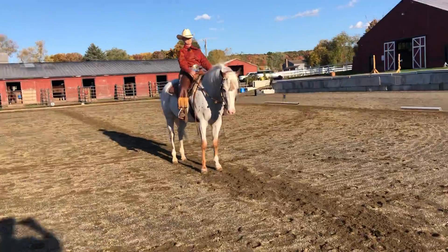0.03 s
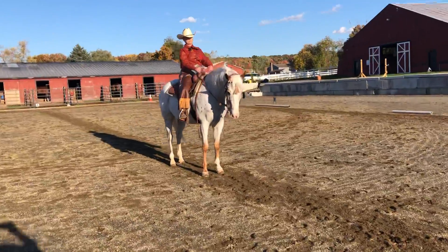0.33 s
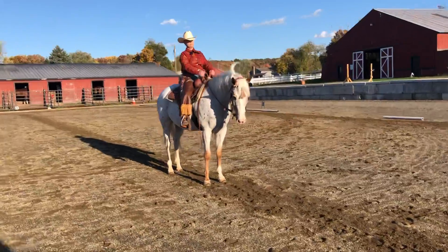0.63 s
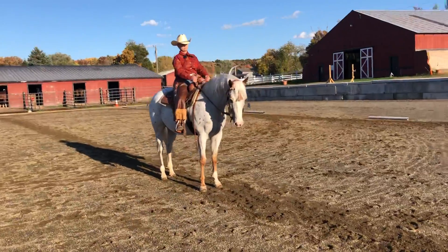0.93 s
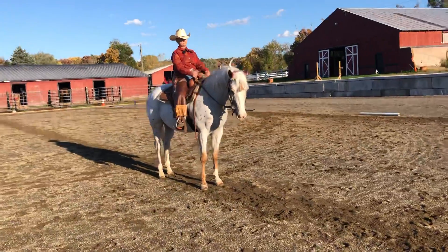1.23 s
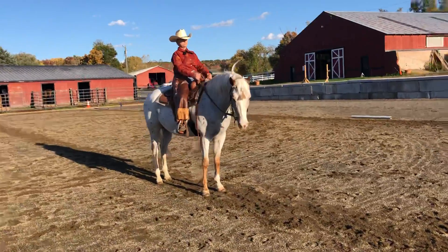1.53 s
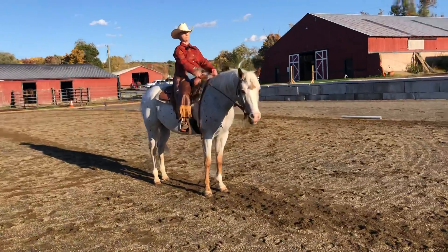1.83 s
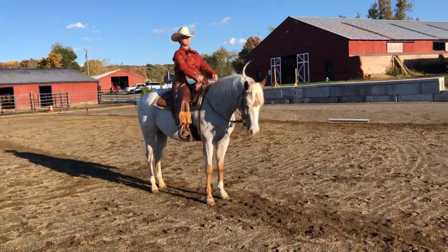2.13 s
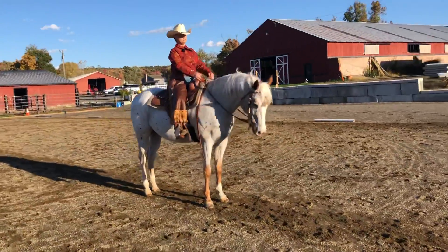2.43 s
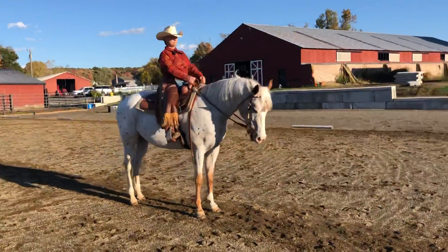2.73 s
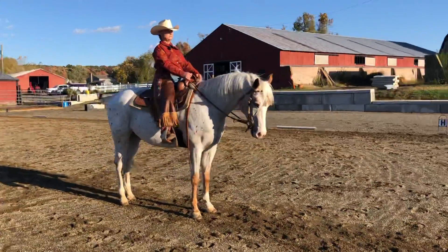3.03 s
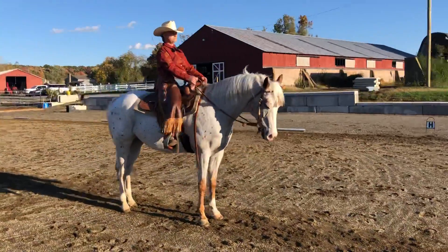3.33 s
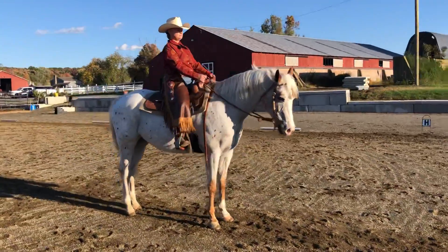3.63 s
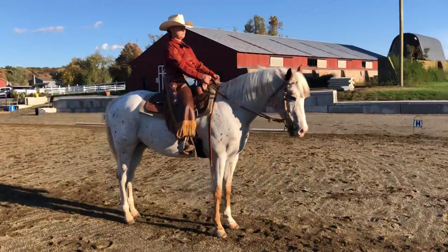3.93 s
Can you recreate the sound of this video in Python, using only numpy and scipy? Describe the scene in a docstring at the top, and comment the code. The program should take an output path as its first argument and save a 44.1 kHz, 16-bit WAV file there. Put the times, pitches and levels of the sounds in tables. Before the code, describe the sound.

Someone walks slowly over sand in an outdoor arena, the steps quiet under wind rumbling on a handheld microphone. One bright metal clink comes early, followed by light jingling like zip pulls, as the gusts grow stronger.

```python
"""Slow steps on the sand of an open riding arena, heard from the walker's hand.
A light breeze thumps the microphone at once; at 0.33 s small metal pieces (probably zip pulls)
give their loudest clink, then jingle and ring on as each step softly crushes the sand.
Gusts build from 1.3 s and buffet hardest near 2.1 s and 3.2 s; a sole drags near the end.
Under it all lie a faint outdoor hush and a few thin, far calls."""
import sys
import numpy as np
from scipy import signal
from scipy.fft import rfft, irfft
from scipy.io import wavfile
from scipy.ndimage import uniform_filter1d

SR = 44100
rng = np.random.default_rng(int(sys.argv[2]) if len(sys.argv) > 2 else 0)


def dump(signal):
    """Clip the signal to [-1, 1] and save it as 16-bit WAV at the path in sys.argv[1]."""
    limited = np.clip(np.atleast_2d(signal).T, -1, 1)
    pcm = np.round(limited * 32767).astype(np.int16)
    wavfile.write(sys.argv[1], SR, pcm)


N = 176400
T = np.arange(N) / SR

# Metal pieces knocking together. Each row: start in seconds, level in dB, ping pitch in Hz.
KNOCKS = [(0.201, -42, 5800), (0.3316, -13, 5890), (.3686, -30.5, 5700), (0.372, -34.5, 5610),
          (0.408, -38, 5700), (0.415, -44, 5740), (0.42, -49, 5900), (.4783, -47, 6470), (.5452, -53, 5940),
          (.6409, -42.5, 6150), (0.7037, -40, 6170), (0.7247, -39.5, 5730), (0.839, -53, 6100),
          (.892, -56, 6940), (0.96, -47.5, 6600), (0.978, -52, 6060), (1.1933, -41.5, 6420),
          (1.2291, -35.5, 6060), (1.2865, -49, 6200), (1.3855, -41.5, 6340), (1.391, -42.5, 5580),
          (1.46, -51.5, 6740), (1.6857, -42.5, 5560), (1.8497, -38, 5750), (1.855, -39, 5770),
          (1.9028, -42.5, 5780), (1.9814, -46, 6200), (2.0223, -48, 6040), (2.0638, -44.5, 6000),
          (2.5085, -40, 5900), (2.585, -53, 5820), (2.615, -49, 5650), (2.692, -59, 5620),
          (2.854, -42, 5630), (2.9266, -45, 5680), (3.045, -43, 5640), (3.085, -42.5, 5800),
          (3.096, -39.5, 5730), (3.1314, -36.5, 5590), (3.2136, -50, 6040), (3.3283, -54, 6030),
          (3.501, -52.5, 8400), (3.7274, -53, 5980), (3.879, -51.5, 5600)]


def from_db(db):
    """Decibels to gain."""
    return 10 ** (np.asarray(db) / 20)


def unit_rms(x):
    """Scale to rms 1."""
    return x / np.sqrt(np.mean(x ** 2) + 1e-20)


def envelope(points):
    """Gain per sample from (seconds, dB) points."""
    return from_db(np.interp(T, *np.transpose(points)))


def colour(x, points, tilt_db_per_oct=0):
    """Filter by (Hz, dB) points plus a tilt, 18 dB per octave down outside them; rms 1."""
    hz, db = np.transpose(points)
    octave, knots = np.log2(np.arange(N // 2 + 1) * SR / N + 1), np.log2(hz)
    outside_oct = np.abs(octave - np.clip(octave, knots[0], knots[-1]))
    gain_db = np.interp(octave, knots, db) + tilt_db_per_oct * (octave - knots.mean()) - 18 * outside_oct
    return unit_rms(irfft(rfft(x) * from_db(gain_db), N))


def lowpass(x, hz):
    """Zero-phase low-pass."""
    return signal.sosfiltfilt(signal.butter(2, hz, fs=SR, output="sos"), x)


def drift(rate_hz):
    """Random wander, mostly slower than the rate; rms 1."""
    hz = np.arange(N // 2 + 1) * SR / N
    return unit_rms(irfft(rfft(rng.standard_normal(N)) / (1 + (hz / rate_hz) ** 4), N))


def grains(per_s, spread_db):
    """Random clicks of uneven size and sign."""
    sizes = from_db(spread_db * np.minimum(rng.exponential(1, N), 4))
    return (rng.random(N) < per_s / SR) * sizes * rng.choice([-1, 1], N)


def even_out(x, span_s):
    """Flatten swells slower than the span."""
    return x / np.sqrt(uniform_filter1d(x ** 2, max(int(span_s * SR), 2)) + 1e-4)


def add(out, start_s, sound):
    """Mix a sound in at a time."""
    start = int(start_s * SR)
    out[start:start + len(sound)] += sound[:N - start]


def mode(t, hz, t60_s):
    """Decaying sine of a struck mode."""
    return np.sin(2 * np.pi * hz * t) * from_db(-60 * t / t60_s)


def footsteps():
    """The shoe crushes clumpy showers of sand grains that swell and die; a dragging sole rasps."""
    # Each row: start in seconds, level in dB, attack and decay in seconds, tilt in dB per octave.
    presses = [(.06, -66, 0.033, 0.19, 3), (.312, -56, 0.0086, 0.14, -3.5),
               (0.459, -58, 0.016, 0.032, -7.5), (0.891, -58, 0.03, 0.0059, -5),
               (1.116, -51, 0.015, 0.046, -2), (1.179, -61, 0.0055, 0.19, -4.5),
               (1.722, -49.5, 0.012, 0.016, -5), (1.755, -50.5, 0.008, 0.08, -3.5),
               (1.83, -55.5, 0.081, 0.027, -6), (2.13, -60, 0.17, 0.23, -6),
               (2.258, -43.5, 0.0012, 0.0039, -8.5), (2.37, -56, 0.059, 0.072, -2.5),
               (2.56, -70.5, 0.074, 1, -3.5), (2.924, -47, 0.019, 0.06, -3.5),
               (2.972, -51.5, 0.012, 0.034, -8), (3.04, -52, 0.068, 0.083, -7.5),
               (3.204, -58, 0.0035, 0.96, -11.5), (3.623, -52.5, 0.013, 0.13, -6.5),
               (3.71, -63, 0.068, 0.19, -9)]
    # Each row: frequency in Hz, level in dB.
    sand_spectrum = [(400, -11), (1000, -2), (2200, 0.5), (4200, 2.5), (5000, 0), (6500, 2), (8300, -2),
                     (10300, -10), (15500, -13)]
    # Each row: start and length in seconds, level in dB, rasp pitch in Hz.
    drags = [(0.646, 0.048, -55.5, 1670), (1.719, 0.024, -51.5, 3730), (1.754, 0.034, -59.5, 3440),
             (3.663, 0.35, -62.5, 1030)]
    sand = grains(per_s=2000, spread_db=2.5) * from_db(2 * drift(rate_hz=90))
    out = np.zeros(N)
    for start_s, db, attack_s, decay_s, tilt in presses:
        age_s = T - start_s
        pressure = np.clip(age_s / attack_s, 0, 1) * np.exp(-np.maximum(age_s - attack_s, 0) / decay_s)
        out += from_db(db) * pressure * colour(sand, sand_spectrum, tilt)
    for start_s, length_s, db, hz in drags:
        rasp = signal.lfilter(*signal.iirpeak(hz, Q=3.3, fs=SR), sand)
        arch = np.sin(np.pi * np.clip((T - start_s) / length_s, 0, 1))
        out += from_db(db) * arch * unit_rms(rasp)
    return out


def clinks():
    """Each knock: a gritty tick, a damped ping that bounces, weak metal modes, a short loose rattle."""
    # Each row: frequency in Hz, level in dB, 60 dB decay time in seconds.
    metal_modes = [(2600, -24.5, 0.018), (3310, -22, 0.025), (5460, -13.5, 0.033), (6230, -22.5, 0.073),
                   (6300, -20.5, 0.021), (8500, -22.5, 0.027), (10010, -28.5, 0.045), (11450, -13.5, 0.017)]
    # Each row: frequency in Hz, level in dB.
    tick_spectrum = [(1200, -43), (2800, -7), (4600, -18), (6200, -2.5), (9000, -20), (11600, -13),
                     (13000, -17), (15500, -19)]
    rise_s, ping_peak_s, tick_decay_s, rattle_decay_s = 0.00033, 0.00062, 0.0028, 0.0077
    usual_knock_db, bounce_s = -39.5, 0.0019
    out, t = np.zeros(N), T[:SR // 10]
    tick_noise = colour(rng.standard_normal(N), tick_spectrum)
    contacts = grains(per_s=900, spread_db=1.5)
    rise = 1 - np.exp(-t / rise_s)
    swell = t / ping_peak_s * np.exp(1 - t / ping_peak_s)
    for k, (start_s, db, hz) in enumerate(KNOCKS):
        phase, hardness_db = 2 * np.pi * hz * t, db - usual_knock_db
        ping = from_db(-0.5) * swell * np.sin(phase)
        tick = np.roll(tick_noise, k * len(t))[:len(t)] * np.exp(-t / tick_decay_s)
        tick *= from_db(-20 + 0.31 * hardness_db)  # harder knocks are brighter
        ringing = sum(from_db(mode_db + rng.normal(0, 1.9)) * mode(t, mode_hz, t60_s)
                      * rng.choice([-1, 1]) for mode_hz, mode_db, t60_s in metal_modes)
        chatter = np.roll(contacts, k * len(t))[:len(t)] * np.exp(-t / rattle_decay_s)
        rattle = signal.fftconvolve(chatter, swell * (np.sin(phase) + np.sin(1.15 * phase)))
        add(out, start_s, from_db(db) * (ping + rise * (tick + ringing)))
        add(out, start_s + np.round(bounce_s * hz) / hz, from_db(db - 5.5) * ping)  # whole cycles later
        add(out, start_s, from_db(-53 + 0.47 * hardness_db) * rattle)
    return out


def free_rings():
    """A struck piece swings free and sings one very high note that wavers as it turns."""
    # Each row: start in seconds, level in dB.
    swings = [(.203, -65), (0.373, -53), (0.411, -52.5), (.641, -58.5), (.84, -67), (.96, -73),
              (1.235, -59), (1.389, -60), (1.852, -59.5), (1.983, -64), (2.478, -66), (2.614, -70),
              (2.86, -58.5), (3.093, -54.5), (3.27, -67), (3.7, -70), (3.89, -71)]
    large_hz, small_hz, small_ping_above_hz = 11526, 12193, 5860
    rise_s, waver_db = 0.0054, 4.5
    knock_s, _, ping_hz = np.transpose(KNOCKS)
    out, t = np.zeros(N), T[:SR // 2]
    for start_s, db in swings:
        nearest_ping_hz = ping_hz[np.argmin(np.abs(knock_s - start_s))]
        hz = small_hz if nearest_ping_hz > small_ping_above_hz else large_hz
        add(out, start_s, from_db(db) * mode(t, hz, t60_s=0.36) * (1 - np.exp(-t / rise_s)))
    return out * from_db(waver_db * drift(rate_hz=63))


def breeze():
    """Wind rumbles on the microphone in puffs; small eddies break as soft pops, brighter in gusts."""
    # Each row: time in seconds, level in dB.
    rumble_levels = [(0.0, -33.5), (0.1, -49), (0.19, -48), (0.27, -37), (0.38, -50), (0.42, -40.5),
                     (0.6, -36), (0.83, -50.5), (0.97, -46), (1.02, -33.5), (1.24, -50.5), (1.36, -31.5),
                     (1.45, -36.5), (1.63, -31), (1.67, -53), (1.8, -35.5), (2.06, -41), (2.1, -25.5),
                     (2.14, -33.5), (2.32, -41), (2.68, -37), (2.86, -47), (3.02, -30), (3.06, -36),
                     (3.16, -25.5), (3.34, -37.5), (3.47, -30), (3.55, -47.5), (3.64, -35.5), (3.7, -40.5),
                     (3.83, -31.5), (3.87, -43), (4.0, -40.5)]
    bass_boosts = [(0, -4.5), (1.9, -15), (2.8, -0.5), (3.6, 9)]
    gust_levels = [(0.0, -54), (0.07, -69.5), (0.58, -53), (0.86, -68), (1.04, -53), (1.25, -71),
                   (1.34, -43), (1.44, -59.5), (1.55, -38.5), (1.57, -52), (1.59, -39), (1.69, -59.5),
                   (1.77, -30.5), (1.79, -44), (2.02, -30), (2.04, -45), (2.08, -26), (2.125, -29),
                   (2.15, -54), (2.21, -39.5), (2.32, -54), (2.55, -35), (2.67, -34), (2.87, -55.5),
                   (3.21, -36.5), (3.23, -47.5), (3.26, -29.5), (3.31, -57), (4.0, -70)]
    # Each row: frequency in Hz, level in dB.
    rumble_spectrum = [(22, -32), (35, -26), (60, 1.5), (100, 1.5), (190, -2.5), (270, -16), (400, -27.5),
                       (800, -70)]
    flutter_spectrum = [(120, 3), (220, 6.5), (430, 2.5), (600, -4), (800, -15.5), (1200, -30.5),
                        (2000, -64)]
    puff_db, full_gust_db = 3, -32.5
    rumble = colour(rng.standard_normal(N), rumble_spectrum)
    rumble += (envelope(bass_boosts) - 1) * lowpass(rumble, hz=88)
    rumble = even_out(rumble, span_s=0.0406) * from_db(puff_db * drift(rate_hz=48))
    eddies = grains(per_s=500, spread_db=2.5)
    pops = even_out(colour(eddies, flutter_spectrum), span_s=0.037)
    dull, gust = lowpass(pops, hz=490), envelope(gust_levels)
    brightness = (gust / from_db(full_gust_db)) ** 0.33
    flutter = dull + brightness * (pops - dull)
    return from_db(1.5) * (envelope(rumble_levels) * rumble + gust * flutter)


def wind_thumps():
    """A large eddy gives one pressure swing; the microphone's low cut draws it into a falling thud."""
    # Each row: centre time in seconds, level in dB, pitch in Hz.
    large_eddies = [(0.014, -21, 157), (0.602, -29, 200), (0.693, -21.5, 109), (1.031, -26, 143),
                    (1.342, -20.5, 193), (1.468, -25, 352), (1.592, -22.5, 269), (1.773, -42, 433),
                    (1.822, -22.5, 277), (1.964, -25.5, 620), (2.006, -25, 457), (2.096, -17, 305),
                    (2.122, -22, 470), (2.537, -25, 426), (2.619, -26.5, 418), (2.68, -20.5, 400),
                    (2.925, -24, 143), (3.022, -19, 220), (3.152, -17, 134), (3.255, -25.5, 322),
                    (3.374, -24.5, 184), (3.486, -21, 194)]
    low_cut_hz = 90
    out = np.zeros(N)
    for centre_s, db, hz in large_eddies:
        phase = 2 * np.pi * hz * (T - centre_s)
        out += from_db(db - 2.5) * phase * np.exp((1 - phase * phase) / 2)
    return signal.sosfilt(signal.butter(3, low_cut_hz, "high", fs=SR, output="sos"), out)


def far_calls():
    """Thin gliding calls, perhaps birds or insects, blurred by distance."""
    # Each row: start and length in seconds, start and end pitch in Hz, level in dB.
    calls = [(.08, 0.21, 3850, 3800, -72), (2.123, 0.56, 1600, 1577, -65.5), (3.3, .085, 4920, 4630, -69),
             (3.35, 0.42, 4200, 4140, -75)]
    out = np.zeros(N)
    for start_s, length_s, start_hz, end_hz, db in calls:
        progress = np.clip((T - start_s) / length_s, 0, 1)
        tone = np.sin(2 * np.pi * np.cumsum(start_hz + (end_hz - start_hz) * progress) / SR)
        arch = np.sqrt(2 * np.abs(np.sin(np.pi * progress)))
        out += from_db(db) * arch * tone * drift(rate_hz=70)
    return out


def outdoor_hush():
    """Faint, steady noise of the open air."""
    # Each row: frequency in Hz, level in dB.
    hush_spectrum = [(100, 8), (400, 5.5), (840, 0.5), (1500, -3), (2400, -9), (4000, -7), (4840, -13.5),
                     (6600, -12), (9500, -18), (15500, -26.5)]
    return from_db(-61.5) * colour(rng.standard_normal(N), hush_spectrum)


def scene():
    """Steps, jingling metal and wind over the hush; mono."""
    hush = outdoor_hush()
    wind = breeze() + wind_thumps()
    return (footsteps() + clinks() + free_rings() + wind + far_calls() + hush)[None]


def record(dry):
    """Steep treble cut."""
    cutoff_hz = 15900
    return signal.sosfilt(signal.ellip(10, 0.1, 80, cutoff_hz, fs=SR, output="sos"), dry)


dry = scene()
out = record(dry)
dump(out)
```